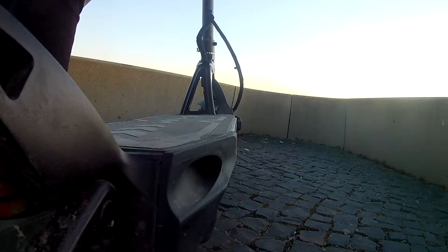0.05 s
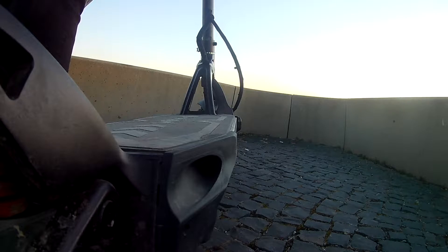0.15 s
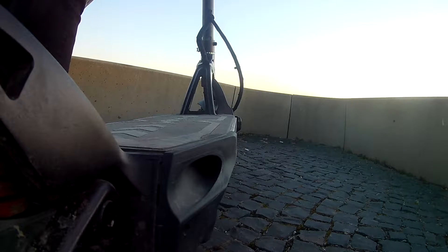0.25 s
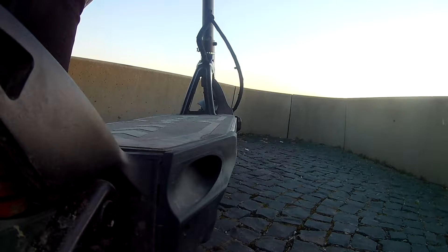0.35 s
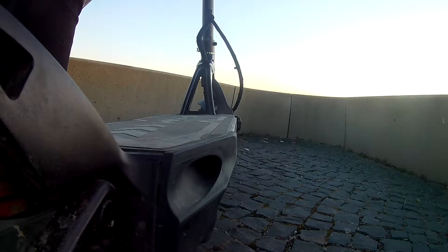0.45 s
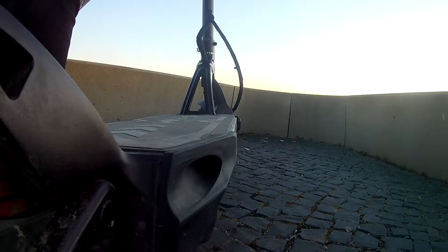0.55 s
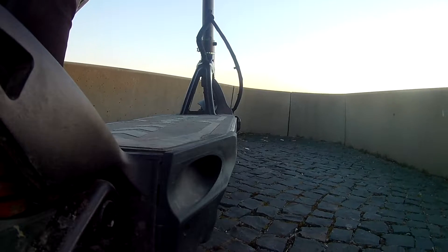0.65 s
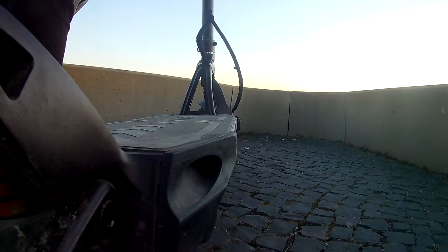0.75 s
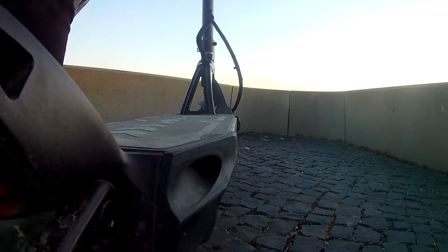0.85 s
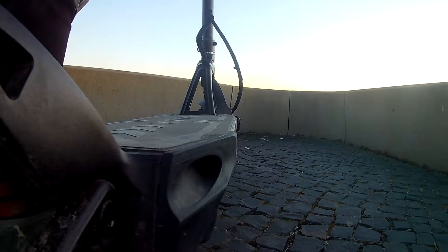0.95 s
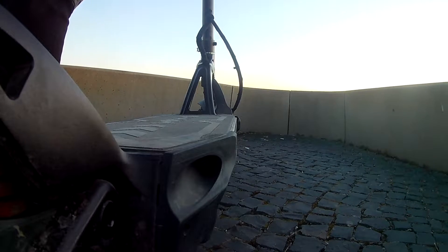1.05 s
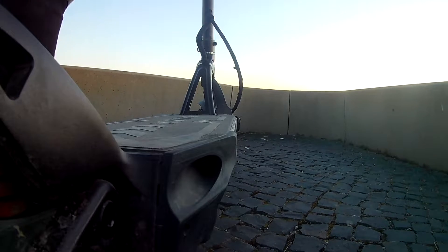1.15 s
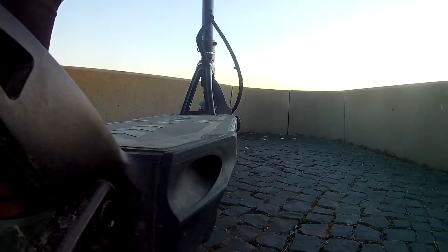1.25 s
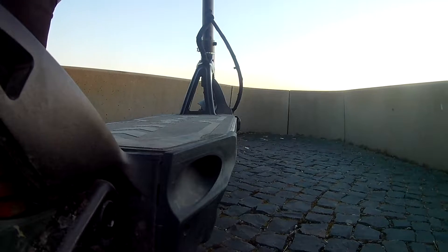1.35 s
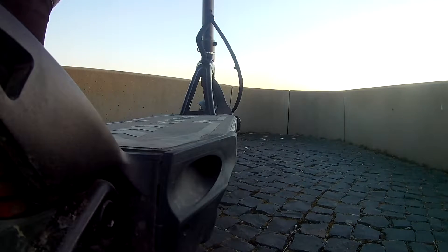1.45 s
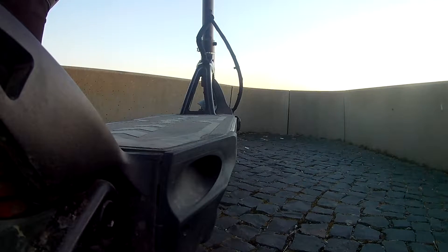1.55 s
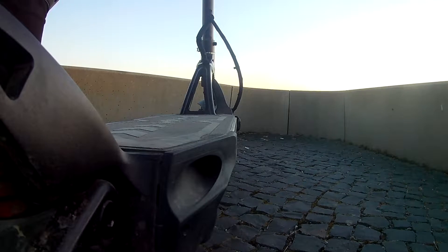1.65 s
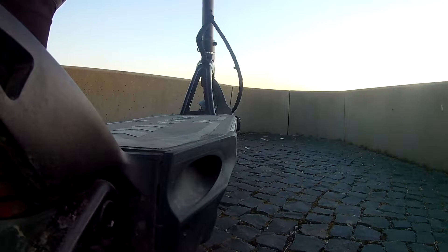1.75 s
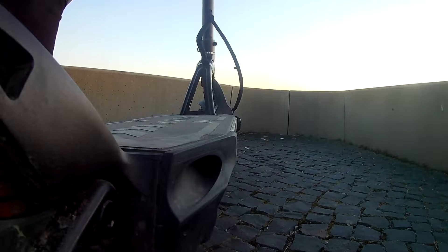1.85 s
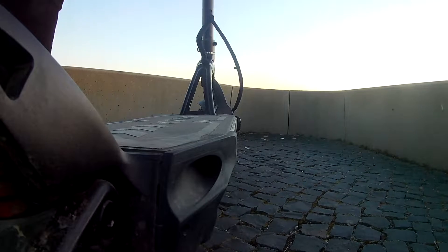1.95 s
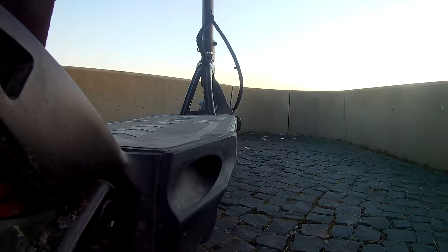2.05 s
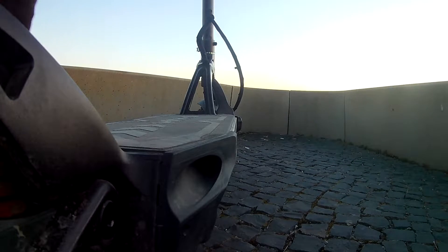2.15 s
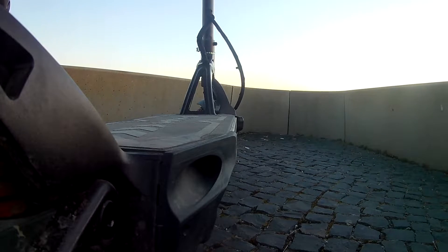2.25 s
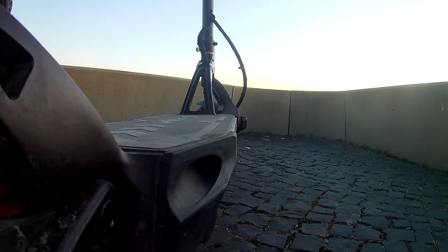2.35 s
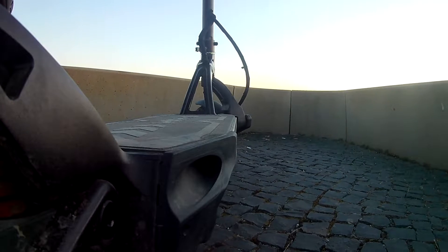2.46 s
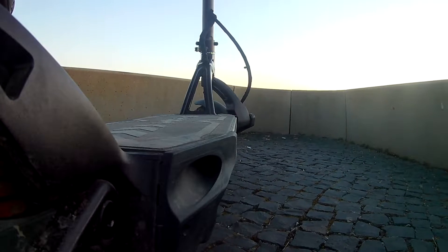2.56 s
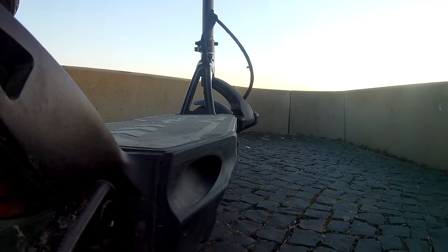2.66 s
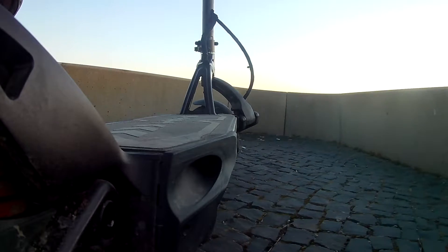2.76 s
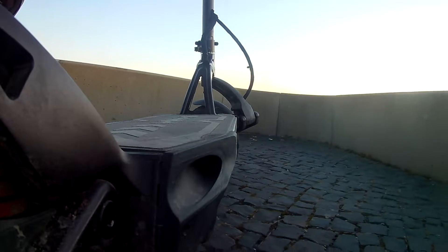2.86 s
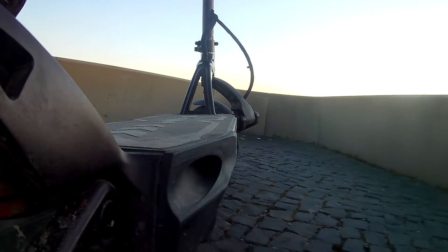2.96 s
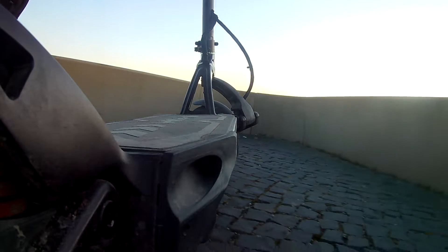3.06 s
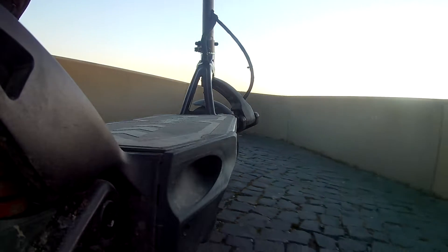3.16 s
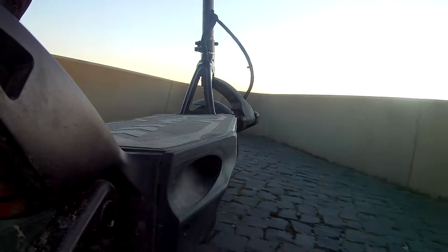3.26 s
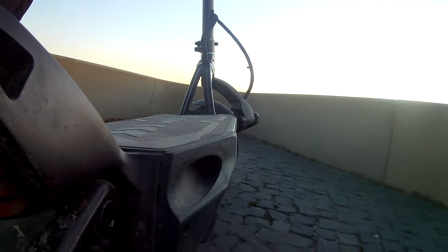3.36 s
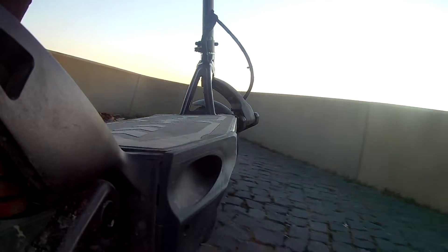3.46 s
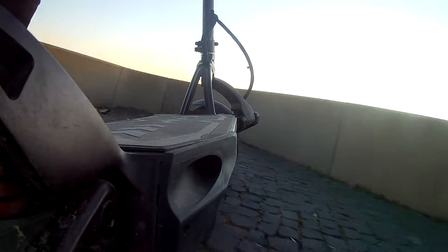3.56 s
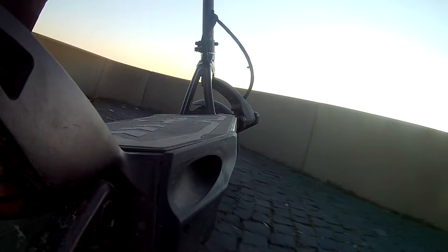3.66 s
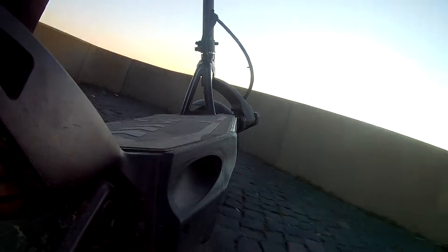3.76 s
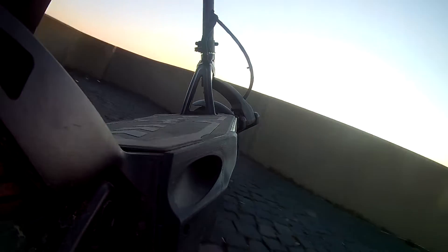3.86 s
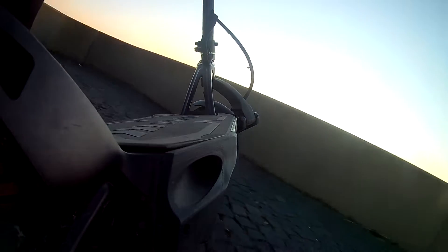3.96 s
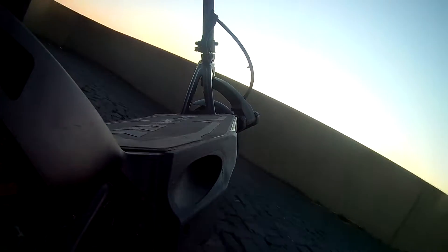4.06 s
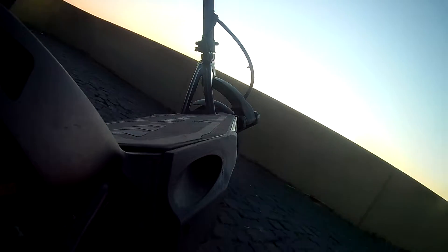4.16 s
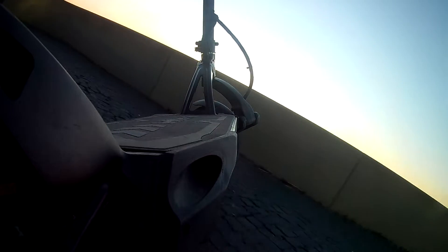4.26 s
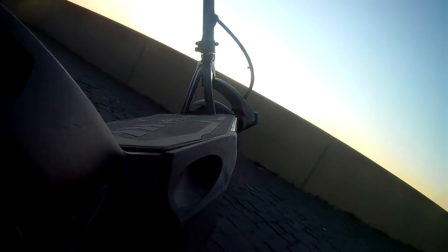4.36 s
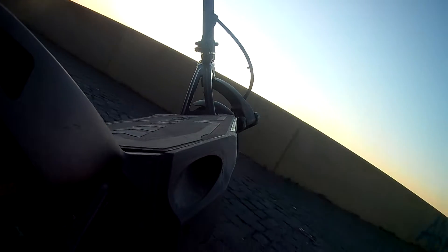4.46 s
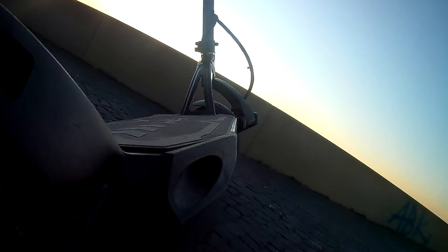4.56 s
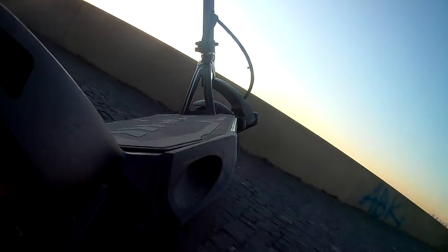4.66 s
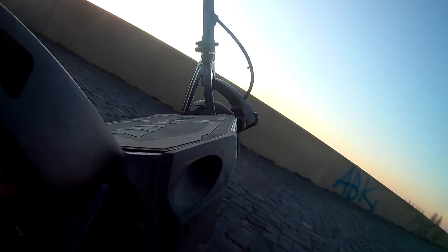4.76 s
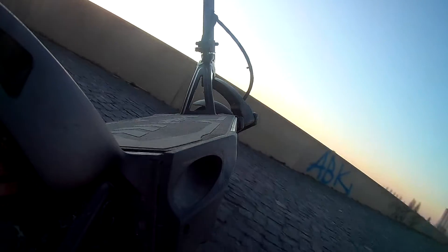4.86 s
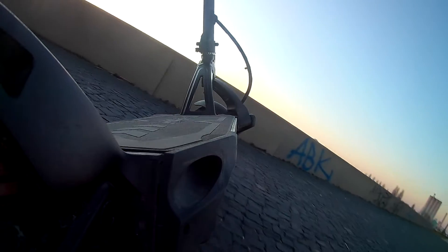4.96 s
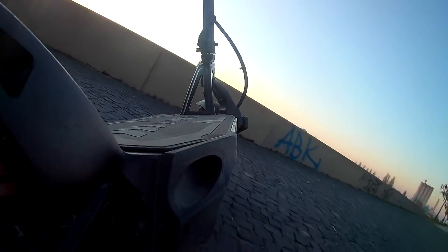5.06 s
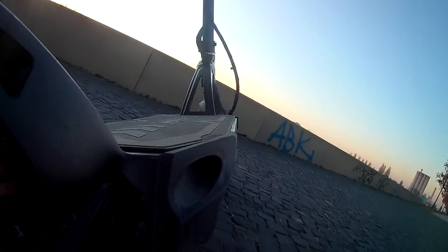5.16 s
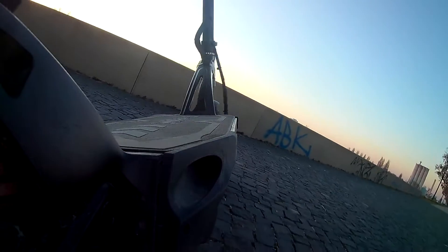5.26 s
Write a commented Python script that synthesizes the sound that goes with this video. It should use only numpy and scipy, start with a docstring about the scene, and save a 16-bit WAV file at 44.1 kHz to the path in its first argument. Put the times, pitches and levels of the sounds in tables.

```python
"""Kick scooter on cobbles

A kick scooter waits while its rider shifts, then the stand snaps up and it rolls off over the stones.
A small camera clamped by the rear wheel hears it all through the frame: knocks ring deck, tube and case
as decaying sines, filtered noise rumbles deck and wheel, and the mount sways as a sine around 45 Hz.
Random taps make loose parts chatter, stand and spring clank, rubbing parts creak as short tones over
faint air noise, and the loudest blows overload the recorder."""
import sys
import numpy as np
from scipy import signal
from scipy.fft import rfft, irfft
from scipy.io import wavfile
from scipy.ndimage import uniform_filter1d

SR = 44100
rng = np.random.default_rng(int(sys.argv[2]) if len(sys.argv) > 2 else 0)


def transcribe(signal):
    """Save signal, clipped to [-1, 1], as a 16-bit WAV file at the path in sys.argv[1]."""
    frames = np.atleast_2d(signal).T
    limited = np.clip(frames, -1, 1)
    pcm = np.round(limited * 32767).astype(np.int16)
    wavfile.write(sys.argv[1], SR, pcm)


N = 234292
T = np.arange(N) / SR

# quiet surroundings and microphone hiss, relative spectrum: (frequency [Hz], density [dB])
AIR_SPECTRUM = [(15, -35.5), (25, -6), (53, 0.5), (144, -11), (183, -3.5), (210, -10.5), (471, -15.5),
                (650, -15), (1030, -21), (1420, -17.5), (1720, -21), (2640, -26.5), (6000, -36.5),
                (15600, -52)]
# steady shaking between blows, before and after the stand snaps up; levels before each layer's trim:
# (time [s], deck rumble [dB], loose-part chatter [dB], mount sway centre [Hz], mount sway [dB])
ROLLING = [
    [(0.0, -74, -70, 43.7, -59), (0.15, -70, -73, 43.4, -69), (0.27, -70, -70.5, 50.6, -61),
     (0.54, -77, -62, 47.8, -69), (0.76, -74, -74, 44.2, -62), (1.07, -72.5, -75, 45.34, -55),
     (1.39, -72, -71.5, 45.8, -67), (1.68, -81, -77, 45.5, -68), (1.83, -76, -67, 43.3, -69),
     (1.96, -71, -81, 42.9, -58), (2.15, -61, -56.5, 43.7, -58)],
    [(2.18, -48, -51.5, 44.95, -53), (2.74, -51, -65.5, 47.4, -53), (2.94, -46, -50, 49.16, -39),
     (3.29, -35.5, -42.5, 44.52, -19), (3.71, -30, -38, 46.45, -27.5), (3.8, -21, -32, 43.52, -29),
     (3.97, -23.5, -30, 46.7, -30), (4.07, -28.5, -34, 46.56, -25), (4.21, -25.5, -32, 38.8, -32),
     (4.66, -38.5, -32, 39.6, -32), (5.31, -33.5, -33.5, 44.1, -22.5)],
]
# short scrapes of shoe or stand on the deck, levels before the layers are mixed:
# (time [s], length [s], dull level [dB], bright level [dB])
SCRAPES = [(0.389, 0.052, -49, -89), (1.86, 0.25, -63, -100), (2.178, 0.094, -27.5, -58),
           (2.227, 0.087, -34.5, -60.5), (2.264, 0.042, -32, -61), (2.353, 0.065, -40, -73),
           (2.797, 0.03, -42.5, -68), (2.85, 0.024, -50, -57)]
# squeaks and creaks of rubbing parts: (time [s], length [s], pitch [Hz], peak before flutter [dB], flutter [dB])
CREAKS = [(0.979, 0.032, 450, -48, 4), (1.849, 0.065, 669, -46, 5), (2.221, 0.028, 1579, -19, 0.5),
          (2.272, 0.026, 1556, -25.5, 7), (2.259, 0.0094, 7070, -31.5, 7), (2.268, 0.023, 7200, -59, 0),
          (3.131, 0.085, 430.5, -33, -3), (3.223, 0.043, 448, -37.5, 6), (3.274, 0.061, 445, -31.5, 3.5)]
# the metal stand clanks: (time [s], stand peak [dB], spring peak [dB], hinge peak [dB])
CLANKS = [(0.401, -45.5, -42, -85), (0.586, -70, -51.5, -73), (2.177, -12.5, -33, -46),
          (2.271, -44, -35.5, -55), (2.366, -40, -56, -69)]
# low jolts as a wheel drops into a joint or the deck is loaded, before each part's trim:
# (time [s], deck level [dB], wheel level [dB], mount swing [dB])
JOLTS = [(0.03, -65, -57, -57), (0.166, -49.5, -52, -71), (0.401, -40, -59, -58), (0.469, -64, -66, -60),
         (0.577, -44, -57, -73), (0.879, -74, -68, -51.5), (0.972, -54, -65, -54), (1.107, -52, -57.5, -59),
         (1.149, -67, -70, -58), (1.787, -52.5, -53, -68), (1.838, -40.5, -43, -62),
         (1.879, -36, -39.5, -54), (1.911, -38, -46, -42.5), (2.008, -43.5, -49, -46),
         (2.178, -11.5, -32, -38), (2.29, -32, -53, -44), (2.359, -26, -41, -46), (2.521, -39, -54, -48),
         (2.691, -55, -42, -46), (2.791, -41, -39, -31), (2.828, -48, -49, -18.5), (2.865, -28.5, -53, -38),
         (2.931, -35, -44, -31), (3.02, -28.5, -31, -31), (3.069, -49, -39, -26), (3.161, -31, -38, -25.5),
         (3.229, -43, -38, -32), (3.363, -23.5, -27.5, -21), (3.409, -40, -44, -18),
         (3.463, -17, -22.5, -17), (3.584, -20.5, -27.5, -39), (3.686, -22.5, -35, -27.5),
         (3.778, -20, -38, -24), (3.861, -7, -9.5, -10), (3.934, -8, -11.5, -23), (3.976, -9, -23, -31),
         (4.021, -18, -18, -19), (4.05, -19.5, -19, -14), (4.104, -7.5, -11.5, -25),
         (4.165, -14.5, -25, -19), (4.258, -9, -9.5, -9.5), (4.278, -7.5, -11, -12),
         (4.335, -4.5, -11, -21), (4.394, -10.5, -26, -27), (4.461, -10, -24, -17), (4.493, -11, -22, -27),
         (4.529, -17, -25, -31), (4.556, -14, -28.5, -29), (4.589, -27, -33.5, -22),
         (4.619, -15.5, -24, -22), (4.702, -11, -20, -13.5), (4.777, -17, -31, -31), (4.864, -11, -37, -34),
         (4.899, -13.5, -35, -20), (4.962, -16, -23.5, -26), (5.025, 2, -9, -32), (5.097, -13.5, -33, -36),
         (5.158, -23.5, -21, -22), (5.21, -18, -19.5, -16.5), (5.249, -26, -37, -20)]
# knocks: reference level, then each part against it before its trim:
# (time [s], reference [dB], tube [dB], clamp [dB], tick [dB])
KNOCKS = [(0.173, -56, 4, -12, -33), (0.193, -56, 0, -2, -26), (0.363, -41, -38, 1, -26),
          (0.4, -28.5, -22, -7.5, -47), (0.414, -36.5, -14, -9, -50), (0.585, -37, -5.5, 0.5, -26),
          (0.983, -56, -12, -5, -26), (1.268, -53, -15, -7, -19), (1.883, -48.5, 2.5, -16, -41),
          (2.003, -46, -5, -4, -39), (2.175, -23, -8, -11.5, -30), (2.18, -16.5, -6, -7, -45),
          (2.193, -20.5, -15, -3, -37), (2.207, -25.5, -18, 2, -33), (2.227, -27, -24, -9, -39),
          (2.283, -22, -15.5, -4.5, -44), (2.331, -36.5, -26, 2.5, -36), (2.365, -22.5, -40, -10, -33),
          (2.407, -48, -14, -2, -38), (2.485, -41, -20, 1.5, -48.5), (2.665, -48, -18, -2, -35),
          (2.713, -48, -18, 0, -29.5), (2.743, -33, -6, -7, -39), (2.803, -24, -13, -4.5, -24),
          (2.818, -24, -2.5, -19, -21), (2.824, -28, -9, -11, -13.5), (2.863, -29.5, -2, -16, -17),
          (2.876, -28, -5, -17, -34), (2.957, -41, -20, -10, -47), (3.022, -33, 1.5, -25, -42),
          (3.073, -37, -13, -12, -44), (3.116, -31, -17, -20, -50), (3.137, -32, -11, -22, -48),
          (3.157, -32, -5, -4, -49), (3.177, -30, -17, -12, -51.5), (3.207, -32, -9, -15, -48),
          (3.233, -26.5, -23, -24, -52), (3.268, -28.5, -21, -14, -58), (3.287, -26.5, -15, -16, -53),
          (3.364, -22, -2.5, -29, -26.5), (3.384, -18.5, -7.5, -34, -36), (3.445, -23, -1, -22, -27.5),
          (3.466, -20, 0.5, -37, -26.5), (3.519, -25.5, -5.5, -20, -31.5), (3.544, -23.5, -3.5, -29.5, -27),
          (3.575, -24, -3.5, -20, -41), (3.594, -23.5, -0.5, -13, -30), (3.622, -21.5, -2, -37, -37.5),
          (3.641, -20, -5, -33, -30), (3.701, -12, -5.5, -41, -26.5), (3.731, -15.5, -9.5, -18, -28),
          (3.792, -7, -8, -34, -31), (3.823, -12, -6.5, -7, -21), (3.85, -8, -25, -4.5, -22),
          (3.857, -22, -5, -12, -13), (3.865, -5, -12, -6, -17.5), (3.874, 0, -6, -5.5, -20.5),
          (3.884, 2.5, -3.5, -29, -23.5), (3.919, -7, -18, -1.5, -12.5), (3.94, 2.5, -10, -19.5, -43),
          (3.985, -13, -5, -15, -23), (4.01, -10.5, -20, -9, -20), (4.016, -17.5, -18.5, -12, -9.5),
          (4.021, -13.5, -16, -1.5, -20.5), (4.03, 6, -12.5, -10, -22), (4.056, -16, -4.5, -27.5, -35),
          (4.081, -17, -11.5, -9, -29.5), (4.087, -8.5, -7, -19, -28), (4.11, -1, -10, -23.5, -33),
          (4.125, -19.5, -8, -8, -41), (4.132, -8.5, -17, -9.5, -36), (4.145, -7.5, -14, -21, -29),
          (4.169, -7, -7, -15, -27.5), (4.231, -20.5, -16, -7, -38), (4.257, -15.5, -7, -14, -21.5),
          (4.281, -18, 1.5, -13, -38), (4.316, -18.5, -12, -4, -26), (4.336, -13, -14, -11, -26),
          (4.355, -7, -14.5, -18, -39), (4.393, -11, -5.5, -16, -26), (4.411, -7, -17, -13, -24.5),
          (4.43, 0, -13.5, -12, -22.5), (4.476, -3, -13, -11, -20.5), (4.492, -1.5, -6.5, -8.5, -23.5),
          (4.558, -11, -5.5, -21, -36), (4.574, -17, -15, -13, -19), (4.617, -9, -4, -26, -33),
          (4.639, -6.5, -22, -16, -23.5), (4.701, 0.5, -12, -24, -31.5), (4.726, -5, -23, -18, -27),
          (4.781, -3.5, -9, -35, -34), (4.807, -1.5, -14.5, -27, -28), (4.837, -32, -6, -5, -28),
          (4.861, -4, -10.5, -25, -31.5), (4.9, -2.5, -16, -19.5, -30), (4.958, -2.5, -12.5, -41, -28.5),
          (4.99, -10, -8.5, -13, -15.5), (5.028, -1, -14, -1.5, -17), (5.074, -5.5, -22, -18, -19.5),
          (5.096, 3, -26, -4.5, -21.5), (5.129, 0, -15, -28, -34), (5.162, -12.5, -9, -12.5, -19),
          (5.21, 1, -11, -36, -38.5), (5.24, -7.5, -24, -13, -27.5), (5.294, 0.5, -12, -35, -35)]

# ringing modes of the camera case: (frequency [Hz], relative level [dB], 60 dB decay [s])
CASE_MODES = [(1180, -13, 0.062), (1455, 23, 0.014)]
# modes of the mount's clamp: (frequency [Hz], relative level [dB], 60 dB decay [s])
CLAMP_MODES = [(1647, 4.5, 0.014), (1818, 5.5, 0.019), (1950, -13.5, 0.042)]
# modes of the frame tube: (frequency [Hz], relative level [dB], 60 dB decay [s])
TUBE_MODES = [(647, -5.5, 0.079), (729.6, -7, 0.079), (928, 7.5, 0.033), (955, -25, 0.038)]
# modes of the deck: (frequency [Hz], relative level [dB], 60 dB decay [s])
DECK_MODES = [(255.5, 2, 0.05), (273.2, 0, 0.16), (308.6, 1.5, 0.077), (351, -12, 0.21),
              (344.4, -19.5, 0.13)]
# modes of the wheel: (frequency [Hz], relative level [dB], 60 dB decay [s])
WHEEL_MODES = [(79.4, -9.5, 0.15), (128.1, -0.5, 0.16), (166.4, 1, 0.06)]
# modes of small ticking parts: (frequency [Hz], relative level [dB], 60 dB decay [s])
TICK_MODES = [(3370, -9.5, 0.014), (3550, 6, 0.0056), (3910, 8, 0.0062), (4437, -5, 0.016)]
# modes of the bolts: (frequency [Hz], relative level [dB], 60 dB decay [s])
BOLT_MODES = [(2366, 1, 0.025), (2636, -4, 0.028), (5330, -8.5, 0.0044), (6320, -8.5, 0.0053),
              (8440, -10.5, 0.0086), (11000, -28, 0.0017)]
# modes of the stand: (frequency [Hz], relative level [dB], 60 dB decay [s])
STAND_MODES = [(135, -10, 0.42), (294, -9.5, 0.049), (340.5, -7, 1), (368, 6.5, 0.21), (527, -14.5, 0.088)]
# modes of the stand's spring: (frequency [Hz], relative level [dB], 60 dB decay [s])
SPRING_MODES = [(478, -4.5, .6), (521, 0, 0.92), (1010, 5, 0.23), (1180, -7.5, .15), (1600, 0.5, .3),
                (1900, -3.5, .6)]
# modes of the stand's hinge: (frequency [Hz], relative level [dB], 60 dB decay [s])
HINGE_MODES = [(2900, -3, 0.48), (3390, 4, 0.24), (3970, -10, .2), (4150, -14, 0.26), (4560, 2, 0.29),
               (5140, -7, .25), (5900, -7, .15)]

# pass bands (low [Hz], high [Hz]) of the closed camera case, its port, its seams, and the low rumble
DULL, BRIGHT, OPEN, LOW = (92, 1760), (3230, 4830), (1830, 17000), (60, 2000)
CHATTER_REF_DB = -33  # chatter level at which the next two base levels hold
FITTINGS_DB, FITTINGS_SLOPE = -60.5, 2.2  # base level [dB]; dB per dB of chatter
HISS_DB, HISS_SLOPE = -70, 0.76  # base level [dB]; dB per dB of chatter
CLAMP_ALONE_DB, CASE_YIELD = -8.5, 1.7  # above this clamp level the case loses so many dB per dB
TOP_HZ = 15770  # top of the recorder's range


def undb(db):
    """Gain of a level in dB."""
    return 10 ** (np.asarray(db) / 20)


def unit(x):
    """Scaled to rms 1."""
    return x / np.sqrt(np.mean(x ** 2))


def curves(table):
    """Each column joined by straight lines, one value per sample."""
    s, *columns = np.transpose(table)
    return [np.interp(T, s, c) for c in columns]


def walk(rate_hz):
    """Random levels stepped at a rate, smoothed into slow drift of rms near 1."""
    k = int(SR / rate_hz)
    steps = np.repeat(rng.standard_normal(N // k + 1), k)
    smooth = uniform_filter1d(uniform_filter1d(steps, k), k)
    return unit(smooth[:N])


def band(x, lo_hz, hi_hz, order):
    """Band-pass filter."""
    return signal.sosfilt(signal.butter(order, [lo_hz, hi_hz], "band", fs=SR, output="sos"), x)


def ring(force, modes, push_ms, passed):
    """A force rings decaying modes through a steep pass band; a softer contact is a longer push."""
    t = T[:SR // 2]
    body = sum(undb(db) * np.sin(2 * np.pi * hz * t) * np.exp(-np.log(1000) * t / t60)
               for hz, db, t60 in modes)
    push = np.hanning(max(int(push_ms * SR / 1000), 1) + 2)
    body = band(np.convolve(body, push)[:len(t)], *passed, order=6)
    return signal.fftconvolve(force, body / np.abs(body).max())[:N]  # a unit blow peaks at 1


def blows(s, db):
    """Single-sample impulses of given levels at times s."""
    force = np.zeros(N)
    force[np.minimum((s * SR).astype(int), N - 1)] = undb(db)
    return force


def taps(per_s, spread_db):
    """Random small taps of uneven size and either sign, their strength drifting in gusts."""
    chance, luck, side = rng.random((3, N))
    size = undb(-spread_db * np.log(luck + 1e-9) + 2.37 * walk(30))
    return (chance < per_s / SR) * size * np.sign(side - .5)


def after(s, db, gain_db, rise_s, fall_s):
    """Gain of the shaking that swells after each blow and dies away; overlaps add as power."""
    t = T[:SR // 2]
    hump = (1 - np.exp(-t / rise_s)) * np.exp(-t / fall_s)
    power = signal.fftconvolve(blows(s, db + gain_db) ** 2, (hump / hump.max()) ** 2)[:N]
    return np.sqrt(np.abs(power))


def with_scrapes(gain, column):
    """A rolling gain plus a quick-rising, slow-falling hump for each scrape."""
    humps = 0
    for row in SCRAPES:
        u = np.clip((T - row[0]) / row[1], 0, 1)
        humps = humps + undb(row[column]) * np.sin(np.pi * u ** 0.28)
    return gain + humps


def air():
    """Steady faint background: noise shaped to a fixed spectrum."""
    hz, db = np.transpose(AIR_SPECTRUM)
    f = np.fft.rfftfreq(N, 1 / SR)
    shape = undb(np.interp(np.log(f + 1), np.log(hz), db))
    return unit(irfft(rfft(rng.standard_normal(N)) * shape, N)) * undb(-66)


def hiss(gain):
    """Thin flickering high noise that follows the shaking and the scrapes."""
    noise = unit(band(rng.standard_normal(N), 3200, 20000, order=2))
    scrape_gain = undb(-16) * with_scrapes(0, column=3)
    return noise * (gain + scrape_gain) * undb(3.1 * walk(60))


def fittings(gain):
    """Small fittings rattle brightly as random taps ring ticking parts and bolts."""
    force = taps(per_s=2500, spread_db=2.6)
    ticks = unit(ring(force, TICK_MODES, .03, BRIGHT))
    bolts = undb(-4.5) * unit(ring(force, BOLT_MODES, .03, OPEN))
    return with_scrapes(gain, column=3) * (ticks + bolts)


def chatter(gain):
    """Loose parts tap case, clamp and tube at random, louder in the scrapes."""
    force = taps(per_s=900, spread_db=2.4)
    case = undb(-10) * unit(ring(force, CASE_MODES, 0.098, DULL))
    clamp = undb(-3.5) * unit(ring(force, CLAMP_MODES, 0.35, DULL))
    tube = undb(-13) * unit(ring(force, TUBE_MODES, 0.2, DULL))
    return with_scrapes(gain, column=2) * (case + clamp + tube)


def sway(hz, gain):
    """The mount swings at its own resonance as a sine of uneven pitch and level."""
    phase = 2 * np.pi * np.cumsum(hz * (1 + 0.054 * walk(25))) / SR
    return np.sqrt(2) * np.sin(phase) * gain * undb(3.4 * walk(18))


def rumble(gain, modes):
    """The rough stone surface, as gusting noise, shakes a part's low modes."""
    stones = rng.standard_normal(N) * undb(3.4 * walk(25))
    return unit(ring(stones, modes, 0.78, LOW)) * gain


def rolling():
    """Steady shaking; jolts renew rumble and sway, knocks renew chatter, fittings and hiss."""
    deck_db, chatter_db, mount_hz, mount_db = curves(np.vstack(ROLLING))
    s, jolt_db, wheel_db, swing_db = np.transpose(JOLTS)
    knock_s, knock_db, _, _, tick_db = np.transpose(KNOCKS)
    bright_db = knock_db + tick_db
    above = chatter_db - CHATTER_REF_DB
    deck_gain = undb(deck_db) + after(s, jolt_db, gain_db=-9, rise_s=0.0059, fall_s=0.018)
    wheel_gain = undb(deck_db - 8.5) + after(s, wheel_db, gain_db=-3.5, rise_s=0.005, fall_s=0.033)
    mount_gain = undb(mount_db - 4) + after(s, swing_db, gain_db=-3, rise_s=0.043, fall_s=0.025)
    chatter_gain = (undb(chatter_db - 5)
                    + after(knock_s, knock_db, gain_db=-41.5, rise_s=0.0055, fall_s=0.021))
    fittings_gain = (undb(FITTINGS_DB + FITTINGS_SLOPE * above)
                     + after(knock_s, bright_db, gain_db=-28, rise_s=0.0033, fall_s=0.019))
    hiss_gain = (undb(HISS_DB + HISS_SLOPE * above)
                 + after(knock_s, bright_db, gain_db=-31, rise_s=0.0061, fall_s=0.013))
    low = rumble(deck_gain, DECK_MODES) + rumble(wheel_gain, WHEEL_MODES) + sway(mount_hz, mount_gain)
    return low + chatter(chatter_gain) + fittings(fittings_gain) + hiss(hiss_gain)


def creaks():
    """Rubbing parts give short pure tones that start quickly and fade unevenly."""
    out, flutter = np.zeros(N), walk(150.3)
    for s, length, hz, db, flutter_db in CREAKS:
        u = np.clip((T - s) / length, 0, None)
        swell = 3 * u * np.exp(1 - 3 * u)  # peaks at 1 a third of the way through
        out += swell * undb(db + flutter_db * flutter) * np.sin(2 * np.pi * hz * T)
    return out


def clanks():
    """Stand, spring and hinge ring on after a blow."""
    s, stand_db, spring_db, hinge_db = np.transpose(CLANKS)
    stand = ring(blows(s, stand_db), STAND_MODES, 0.3, DULL)
    spring = ring(blows(s, spring_db), SPRING_MODES, 0.27, DULL)
    hinge = ring(blows(s, hinge_db), HINGE_MODES, .03, OPEN)
    return stand + spring + hinge


def jolts():
    """Soft heavy blows, with longer pushes, ring deck and wheel."""
    s, deck_db, wheel_db, _ = np.transpose(JOLTS)
    deck = ring(blows(s, deck_db), DECK_MODES, 0.87, DULL)
    wheel = ring(blows(s, wheel_db + 2.5), WHEEL_MODES, 1.8, LOW)
    return deck + wheel


def knocks():
    """Each blow rings every part; a few ms of tiny rebounds roughen it, longest in the small fittings."""
    s, db, tube_db, clamp_db, tick_db = np.transpose(KNOCKS)
    scatter = rng.standard_normal(N)

    def rough(level_db, rebound_db, decay_s):
        """A blow followed by a decaying burst of noise."""
        force = blows(s, level_db)
        tail = signal.lfilter([1], [1, -np.exp(-1 / (decay_s * SR))], force)
        return force + undb(rebound_db) * tail * scatter

    spared_db = CASE_YIELD * np.clip(clamp_db - CLAMP_ALONE_DB, 0, None)
    case = ring(rough(db - 4 - spared_db, -22.5, 0.0023), CASE_MODES, 0.41, DULL)
    clamp = ring(rough(db + clamp_db - 1, -11.5, 0.0056), CLAMP_MODES, 0.42, DULL)
    tube = ring(rough(db + tube_db + 4.5, -24.5, 0.0057), TUBE_MODES, 0.12, DULL)
    deck = ring(rough(db - 13, -29.5, 0.0077), DECK_MODES, 1.0, DULL)
    bright = rough(db + tick_db + 2, -19.5, 0.0089)
    ticks = ring(bright, TICK_MODES, .03, BRIGHT)
    bolts = undb(-16.5) * ring(bright, BOLT_MODES, .03, OPEN)
    return case + clamp + tube + deck + ticks + bolts


def scene():
    """All that shakes the camera, over the quiet air, in one channel."""
    return (air() + rolling() + creaks() + clanks() + jolts() + knocks())[None]


def record(dry):
    """The recorder overloads with a short knee at full scale, then its top is cut."""
    knee = 8  # higher is harder
    loud = dry / (1 + np.abs(dry) ** knee) ** (1 / knee)
    return signal.sosfilt(signal.ellip(12, .1, 60, TOP_HZ, fs=SR, output="sos"), loud)


dry = scene()
out = record(dry)
transcribe(out)
```